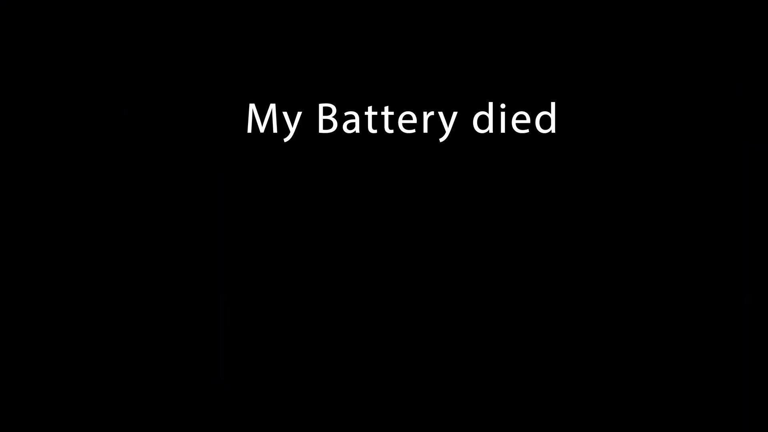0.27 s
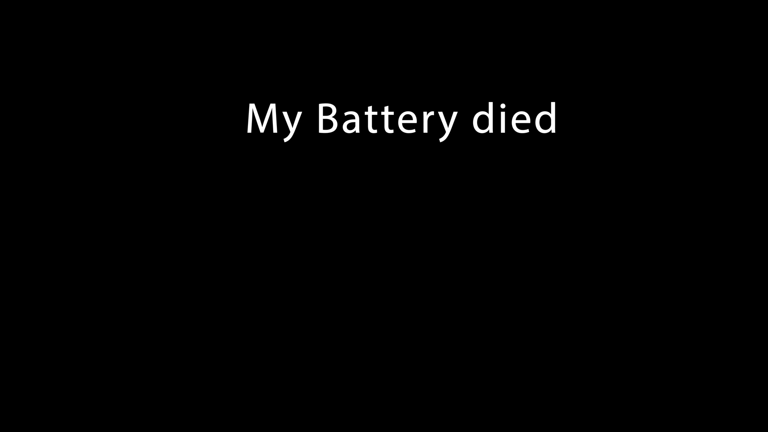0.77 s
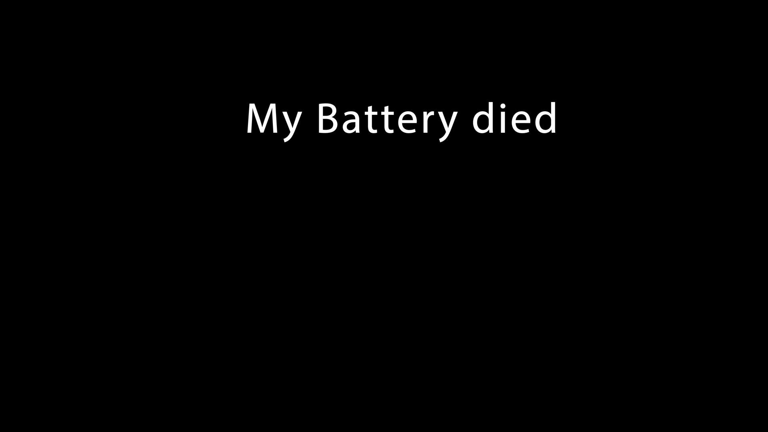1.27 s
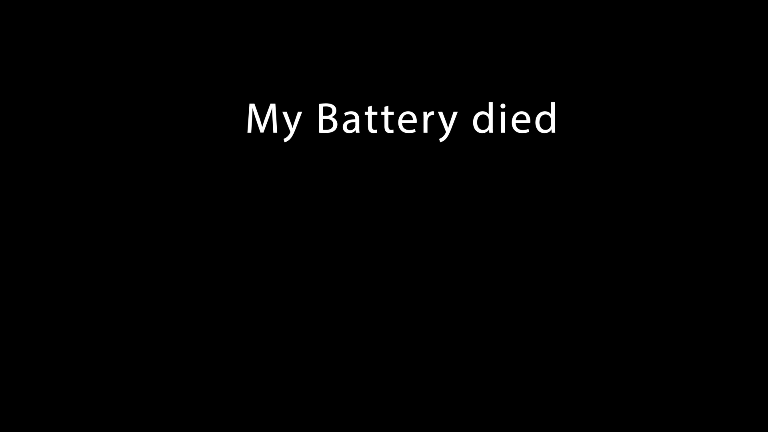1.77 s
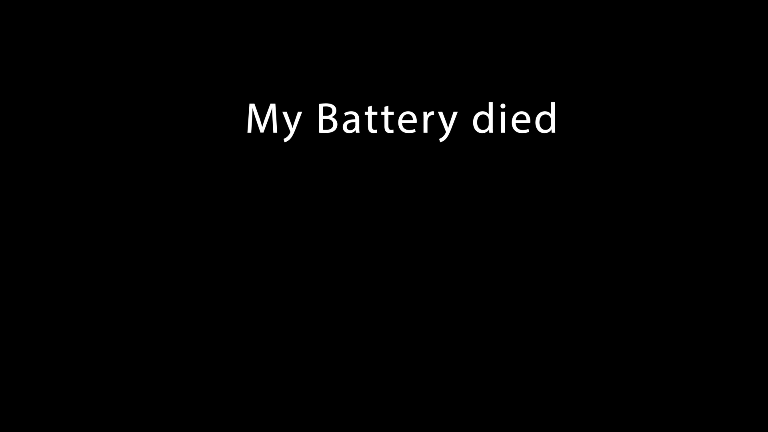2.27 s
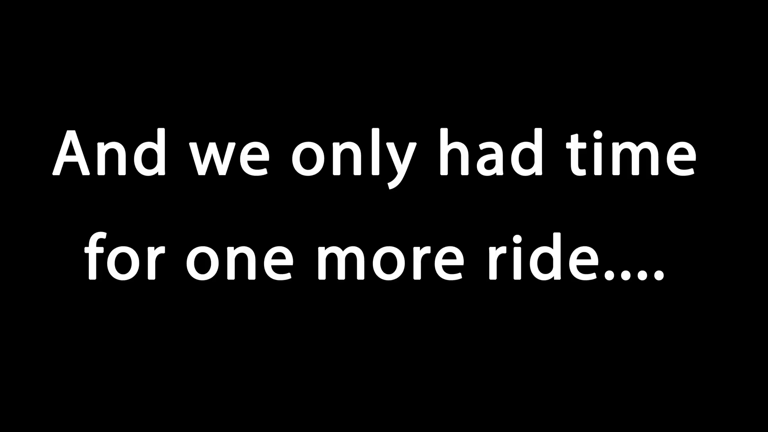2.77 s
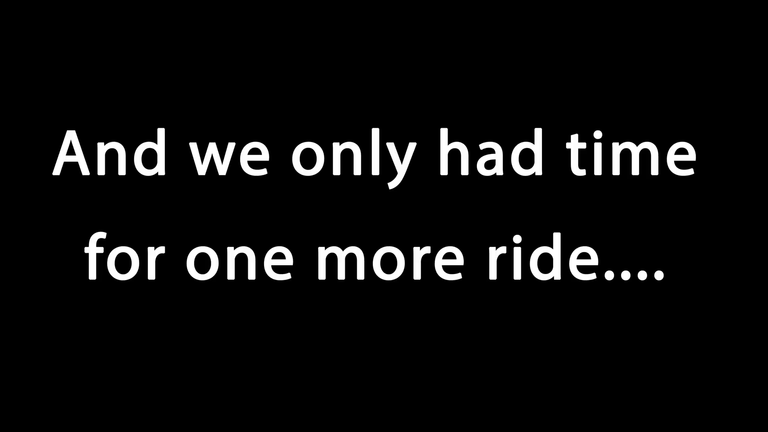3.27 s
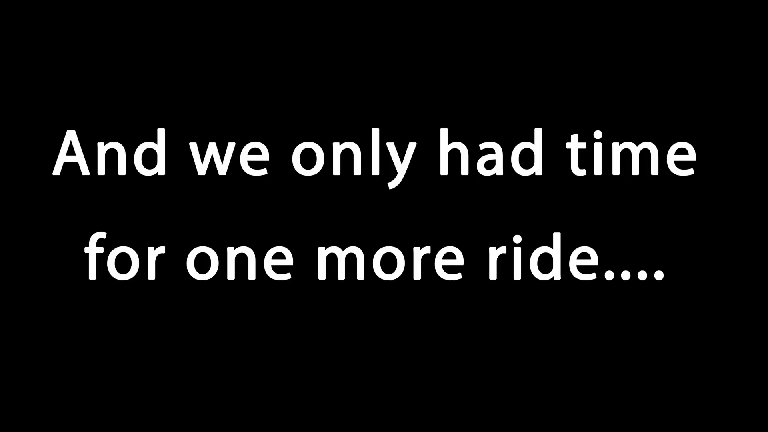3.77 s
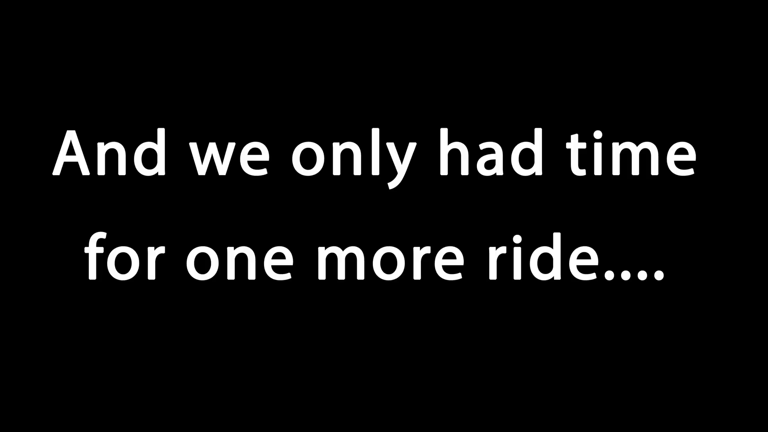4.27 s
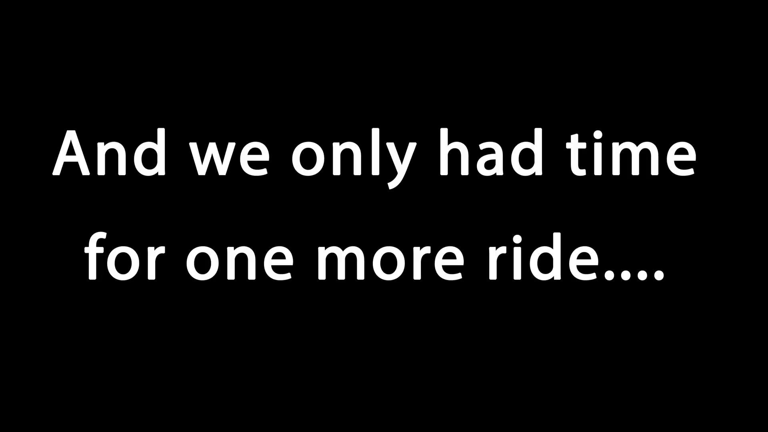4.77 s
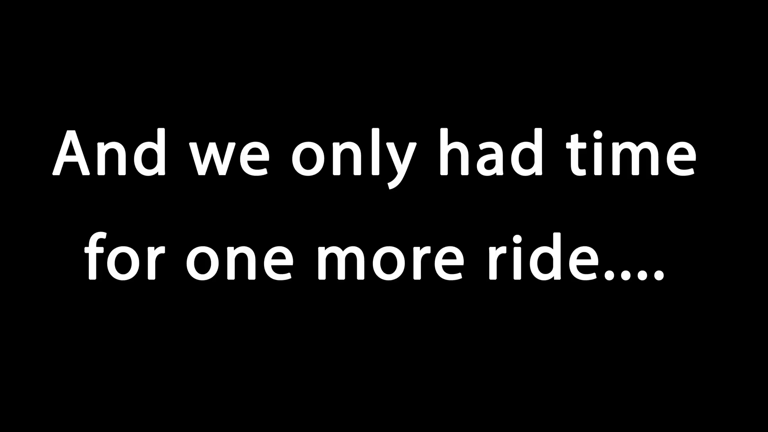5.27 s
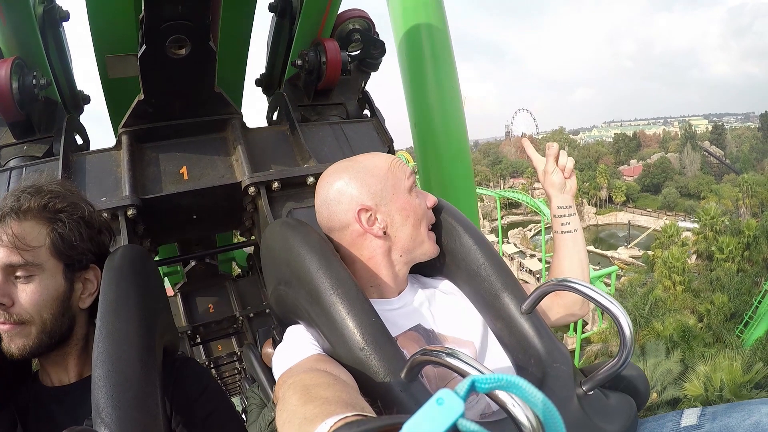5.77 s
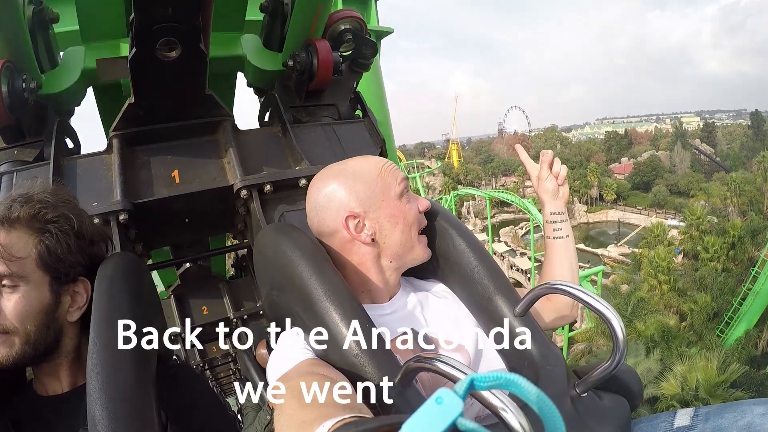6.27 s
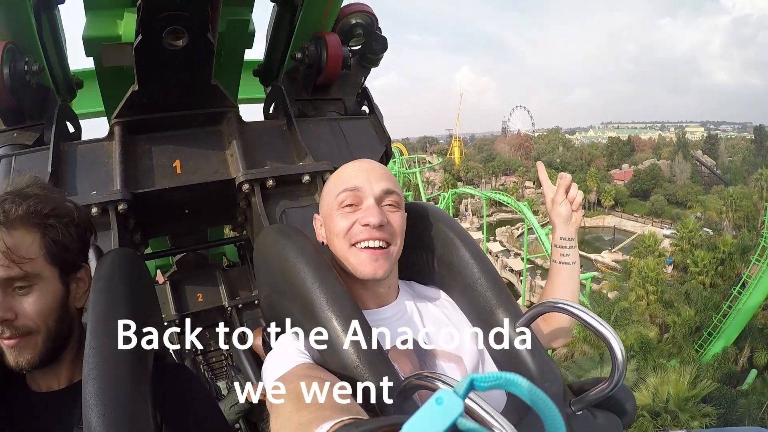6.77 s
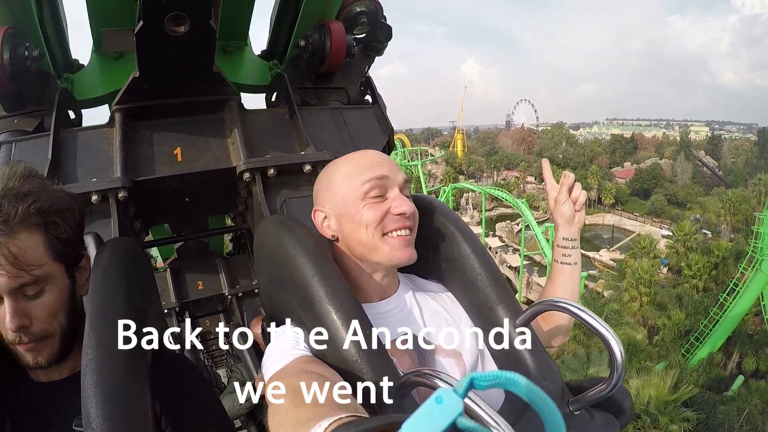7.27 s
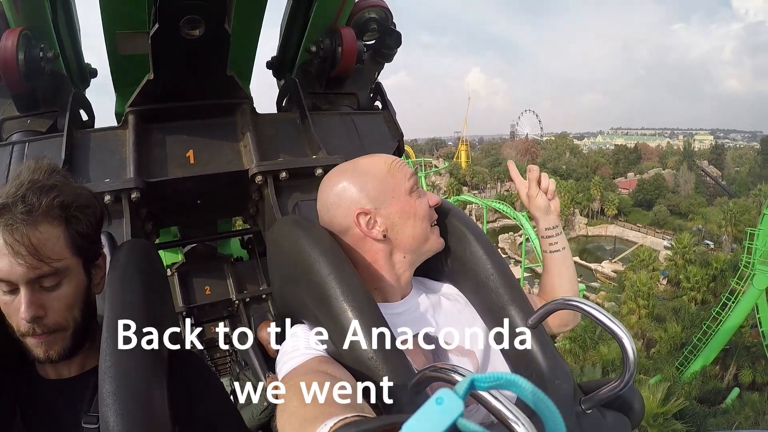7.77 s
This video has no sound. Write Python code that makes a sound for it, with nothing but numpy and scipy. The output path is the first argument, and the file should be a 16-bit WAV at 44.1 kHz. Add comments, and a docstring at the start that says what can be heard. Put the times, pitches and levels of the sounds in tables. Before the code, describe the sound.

First comes only low, soft crackling hiss, steady and slightly wide, with small ticks. Then, without any fade, a close, nearly mono microphone on an open-air coaster train picks up the anti-rollback pawl dropping tooth by tooth, hard and metallic, ringing the car's frame. Chain rattle, rumbling wheels, brief hollow booms and faint high squeaks fill the short gaps.

```python
"""First a faint, crackling hiss: coloured noise with a grainy top and small scattered ticks.
It cuts abruptly to a seat on a roller coaster train climbing its lift hill. At each clack the anti-rollback
pawl drops into the rack and rings the steel car, made from fading sine tones and bursts of noise.
Between the clacks, swells of noise give the softer clatter of the chain and the other cars; rough noise and
narrow resonances make the wheels rumble and squeak. The close microphone rounds off the peaks."""
import sys
import numpy as np
from scipy import signal
from scipy.fft import rfft, irfft, next_fast_len
from scipy.io import wavfile

SR = 44100
rng = np.random.default_rng(int(sys.argv[2]) if len(sys.argv) > 2 else 0)


def to_wav(sig):
    """Store sig (one row per channel, or 1-D mono) as 16-bit WAV at the path in sys.argv[1].

    Samples outside -1..1 are clipped; the rate is SR.
    """
    pcm = np.clip(np.atleast_2d(sig), -1, 1) * 32767
    pcm = np.round(pcm).astype(np.int16)
    wavfile.write(sys.argv[1], SR, pcm.T)  # frames by channels


N = 354563
TIME = np.arange(N) / SR   # seconds
CUT_S = 5.590   # the hiss ends and the train begins
CUTOFF_HZ = 15700

# The pawl rides up a tooth and drops. Each row: drop in seconds, relative blow in dB, relative rattle in dB,
# hardness as a treble tilt in dB, relative scrape before the drop in dB.
CLACKS = [(5.6095, -2.5, -2.5, 1, -18.5), (5.7686, -2.5, -3, 0.5, -24.5), (5.9649, -3.5, -0.5, 0, -19.5),
          (6.2410, 0.5, 4.5, -2, -47), (6.5090, -3.5, -3, -0.5, -21), (6.7600, -20, -12, -9, -59),
          (6.7940, -0.5, 2.5, -0.5, -12.5), (7.134, -22, -16, -1, -47), (7.1616, 0, 1.5, -0.5, -12.5),
          (7.339, -24, -34, 6.5, -64), (7.433, -6, -1, -2, -31), (7.5970, -1.5, 0, -1, -21.5),
          (7.8036, -3.5, -2.5, 1, -21.5), (7.9884, -2, -2, -0.5, -35)]
# Modes of the steel car. Each row: pitch in Hz, relative level in dB, time to fade by 60 dB in seconds.
CAR_MODES = [(167.1, -28, 0.43), (264, -28, 0.27), (382, -18, 0.08), (476.7, -23.5, 0.24),
             (515, -13.5, 0.11), (574.2, -15, 0.17), (614, -16.5, 0.06), (683, -29, 0.068),
             (763.9, -30.4, 0.94), (826, -17.5, 0.17), (900, -25, 0.053), (963, -22.2, 0.44),
             (1032, -26, 0.26), (1096, -7.5, 0.07), (1148, -22, 0.2), (1178, -14.5, 0.26),
             (1211, -12, 0.14), (1343, -8.5, 0.12), (1420, -16, 0.049), (1521, -24, 0.33),
             (1671, -21.5, 0.19), (1794, -33.5, 0.72), (2024, -27, 0.3), (2150, -31, 0.16),
             (2463, -37.5, 0.26)]
# Colour of the car's frame. Each row: frequency in Hz, relative level in dB per Hz.
FRAME_COLOUR = [(40, -18.5), (150, -5.5), (330, -7), (550, -2), (1300, 3), (1700, -13), (3000, -24),
                (6000, -75)]
# Colours of the pawl's rattle and its crack. Each row: frequency in Hz, relative level in dB per Hz.
RATTLE_COLOUR = [(600, -6.5), (1700, 9), (2400, 1.5), (3500, -1.5), (4400, 3), (5350, 0.5), (6100, -8.5),
                 (7500, -12), (9000, -14.5), (11000, -34), (15000, -66)]
CRACK_COLOUR = [(1000, 4.5), (10000, 4), (12000, -7), (14500, -6), (16000, -19)]
# Bright modes of the pawl and rack. Each row: pitch in Hz, width in Hz, level over the broad rattle in dB.
RACK_MODES = [(2480, 15, -6), (2493, 14, 9), (2932, 21, 5.5), (3300, 10, 4.5), (3835, 49, 3.5),
              (4480, 18, 9.5), (4470, 10, 1), (4630, 9, 6.5), (4710, 6.6, 4), (4940, 5.5, 7.5),
              (5310, 125, 3), (5740, 8.8, -0.5), (6500, 12, 6), (6250, 7.6, -9), (7030, 37, -2.5),
              (7700, 2.9, 11), (8140, 31, 2), (9000, 51, -7), (10200, 23, -5)]

# Chain and farther pawls, between the clacks. Each row: peak in seconds, fall in seconds,
# relative level in dB, treble against that level in dB.
CLATTER = [(5.690, 0.2, -25, 4.5), (5.900, 0.056, -27, -10), (6.082, 0.029, -21.5, -4),
           (6.137, 0.066, -18, 4.5), (6.412, 0.04, -16, 3), (6.540, 0.061, -28.5, 7),
           (6.630, 0.069, -28, 8), (6.932, 0.026, -31, -16), (7.01, 0.089, -30, 4),
           (7.361, 0.022, -22.5, -10), (7.455, 0.023, -23, 6), (7.500, 0.039, -14.5, -2),
           (7.714, 0.042, -23.5, -13), (7.850, 0.12, -25, -19), (7.948, 0.03, -18.5, -2.5)]
# Colour of the clatter. Each row: frequency in Hz, relative level in dB per Hz.
CLATTER_COLOUR = [(60, -15), (200, -6), (450, -2), (800, -2), (1150, 5.5), (1380, -3.5), (1550, -7.5),
                  (2400, -18), (3400, -20.5), (5300, -22.5), (6400, -31), (9000, -38.5), (11000, -51),
                  (15000, -56)]
SCRAPE_LEAD_S, SCRAPE_FALL_S, SCRAPE_TREBLE_DB = 0.021, 0.018, -1   # it peaks this long before each drop
RISE_SHARE = 0.4   # a swell's rise time as a share of its fall time

# Rolling of the wheels over time. Each row: time in seconds, relative level in dB.
ROLLING_LEVEL = [(5.59, -28), (5.95, -24.5), (6.23, -34), (6.35, -34), (6.55, -26), (6.72, -35.5),
                 (6.9, -30), (7.1, -37.5), (7.5, -29.5), (7.85, -31), (8.04, -28.5)]
# Colours of the rolling and of the swaying car. Each row: frequency in Hz, relative level in dB per Hz.
ROLLING_COLOUR = [(20, -20), (70, -5.5), (150, -2), (330, -3), (600, -6), (800, 3), (1200, -1),
                  (1550, -8.5), (3300, -22), (5000, -31.5), (6500, -36.5), (9000, -42), (15000, -56)]
SWAY_COLOUR = [(15, -8), (30, -5), (43, -0.5), (65, -5.5), (120, -25), (400, -63), (2000, -100)]
# Low modes kept going by the wheels. Each row: pitch in Hz, width in Hz, relative level in dB.
DRONE_MODES = [(165, 25, -0.5), (270, 25, -5), (137, 7.5, -2.5)]
DRONE_DB, DRONE_GROWS_DB_PER_S = -45.5, 6   # relative level before following the rolling
DRONE_FOLLOWS = 0.5   # share of the rolling's swing in dB
SWAY_DB, SWAY_GROWS_DB_PER_S = -41.5, 1.7   # relative level at the cut
# The car booms over a track joint. Each row: middle in seconds, length in seconds, pitch in Hz, relative dB.
BOOMS = [(6.140, .06, 467, -24), (6.175, .06, 261, -23.5), (6.225, 0.14, 170, -26.5),
         (6.268, 0.049, 256, -22), (6.320, 0.069, 268, -31), (7.240, .06, 171, -34), (7.880, .12, 145, -35)]
# Wheel and chain squeaks. Each row: middle in seconds, length in seconds, pitch in Hz, relative level in dB.
SQUEAKS = [(5.84, 0.085, 4900, -43.5), (5.917, 0.05, 3570, -37), (5.925, .05, 5580, -41.5),
           (6.037, 0.036, 4770, -41), (6.102, 0.069, 4770, -40), (6.115, 0.028, 4000, -39),
           (6.529, 0.076, 5160, -35), (6.96, .18, 2480, -47), (7.02, 0.067, 4750, -42),
           (7.37, .06, 2650, -42), (7.389, 0.045, 5190, -44), (7.461, 0.052, 4880, -32),
           (7.582, 0.041, 4840, -39), (7.690, 0.12, 2480, -46.5)]

SINGING_HZ, SINGING_DB = 764.2, -36   # a steel mode that the chain keeps sounding
LINKS_PER_S, LINK_LOW_HZ, LINK_HIGH_HZ, LINK_T60_S = 45, 4190, 5870, 0.1   # small steel parts of the chain
# The track heard from all around. Each row: frequency in Hz, relative level in dB per Hz.
AROUND_COLOUR = [(40, -35), (110, -34), (200, -16), (290, -2.5), (420, 5.5), (650, -3), (800, -3),
                 (1200, -20), (1600, -7), (2200, -38), (3200, -28.5), (4000, -49), (9000, -55),
                 (15000, -53)]
AROUND_DB = -52

# The hiss over time. Each row: time in seconds, body level in dB, level of the grainy top in dB.
HISS_LEVEL = [(0, -53, -61), (0.2, -53.5, -62.5), (0.45, -52, -58), (0.85, -53, -61.5), (1.65, -53.5, -60),
              (2.2, -53.5, -58.5), (2.8, -52.5, -59.5), (3.2, -52.5, -60), (4.2, -51.5, -58),
              (5.59, -51.5, -59)]
# Colours of the body and of the grainy top. Each row: frequency in Hz, relative level in dB per Hz.
HISS_BODY = [(20, 1.5), (33, 3.5), (60, -1.5), (240, -6), (650, -4.5), (1020, -5.5), (1400, -1), (1850, 2),
             (2200, -4), (2900, -1.5), (3300, 0.5), (3950, -7.5), (5400, -14), (7000, -22)]
HISS_FIZZ = [(2500, -9), (4950, 1.5), (5500, -3.5), (6200, 5), (7050, -6), (7400, -1), (7800, -5),
             (8400, 0), (9700, -0.5), (10450, -4.5), (11600, -6.5), (12300, -2), (13300, -7.5),
             (15500, -13.5)]
# The fizz thickens briefly. Each row: middle in seconds, level in dB.
FLURRIES = [(0.51, -59), (0.96, -59), (1.77, -54.5), (2.18, -58), (2.55, -59), (4.05, -52.5)]
FLURRY_S = 0.031   # half width of a flurry
# Ticks in the hiss. Each row: start in seconds, relative level in dB.
TICKS = [(0.483, -31), (.5677, -34), (1.2637, -30), (1.3653, -30.5), (1.506, -35), (3.005, -32),
         (4.227, -35), (5.1283, -36), (5.3965, -29)]
# Hollows in the hiss. Each row: centre in Hz, width in Hz, depth from 0 to 1.
HISS_DIPS = [(248, 22, 0.38), (1025, 36, 0.73), (5370, 220, 0.8), (6700, 220, 0.44), (7670, 380, 0.73)]
# Left against right. Each row: frequency in Hz, left minus right in dB.
HISS_BALANCE = [(60, -1.5), (200, -7), (700, -12.5), (1290, -9.5), (2380, -8.5), (4400, -5.5), (8120, -2),
                (15000, 3.5)]
# How alike the two sides are. Each row: frequency in Hz, correlation from 0 to 1.
HISS_LIKENESS = [(60, 0.8), (640, 1), (1400, 0.86), (3100, 0.85), (7000, 0.54), (15000, 0.78)]
# Delay of the right side. Each row: frequency in Hz, lag in radians.
HISS_PHASE = [(500, 0.046), (2300, 0.57), (5500, 0.42), (8000, 0.23), (15000, .05)]


def from_db(db):
    """Decibels to gain."""
    return 10 ** (np.asarray(db) / 20)


def rms_one(x):
    """Scale to an average strength (rms) of 1."""
    return x / np.sqrt(np.mean(x ** 2) + 1e-20)


def in_time(rows):
    """Draw one smooth-running curve over time for each column of a table."""
    s, *columns = np.transpose(rows)
    return [np.interp(TIME, s, column) for column in columns]


def at_bins(points, size):
    """Read a table, over log frequency, at the bins of a transform."""
    hz, value = np.transpose(points)
    bins_hz = np.fft.rfftfreq(size, 1 / SR)
    return np.interp(np.log(bins_hz + 1), np.log(hz), value)


def shaped(x, spectrum):
    """Colour a signal by a spectrum in dB."""
    length = x.shape[-1]
    size = next_fast_len(length, True)
    return irfft(rfft(x, size) * from_db(at_bins(spectrum, size)), size)[..., :length]


def noise(spectrum, grain_db=0):
    """Coloured noise of rms 1; uneven sizes of its tiny impacts make it grainy."""
    sizes = from_db(grain_db * np.minimum(rng.exponential(1, N), 7))
    return rms_one(shaped(rng.standard_normal(N) * sizes, spectrum))


def drift(rate):
    """Wander at random: straight lines between random values, so many values a second."""
    knots = rng.standard_normal(4000)
    return np.interp(TIME * rate, np.arange(len(knots)), knots)


def resonance(x, hz, width_hz):
    """Two-pole resonance with gain 1 at its peak."""
    r = np.exp(-np.pi * width_hz / SR)
    feed = np.array([1, 0, -1]) * (1 - r * r) / 2
    back = [1, -2 * r * np.cos(2 * np.pi * hz / SR), r * r]
    return signal.lfilter(feed, back, x)


def ringing(x, modes):
    """A rough force heard through steel: its modes (Hz, width Hz, dB) stand out and ring on."""
    return x + sum(from_db(db) * resonance(x, hz, width_hz) for hz, width_hz, db in modes)


def dying(t, t60):
    """Envelope that loses 60 dB in t60 seconds."""
    return np.exp(-np.log(1000) * t / t60)


def strikes(times, gains, response):
    """Place one copy of a response at each time."""
    out = np.zeros(N)
    for s, gain in zip(times, gains):
        start = int(s * SR)
        out[start:start + len(response)] += gain * response[:N - start]
    return out


def brief_tones(rows, width_hz, taper):
    """A narrow resonance, rubbed at random, swells and fades once for each row."""
    out = np.zeros(N)
    for s, length_s, hz, db in rows:
        window = signal.windows.tukey(int(1.5 * length_s * SR), taper)
        rubbed = resonance(rng.standard_normal(SR), hz, width_hz)
        tone = resonance(rubbed, hz, width_hz)[-len(window):]
        start_s = s - len(window) / SR / 2
        out += strikes([start_s], [from_db(db)], window * rms_one(tone))
    return out


def car_blows(knock_hz, knock_s, knock_db, modes_db, frame_db, frame_t60, build_s, vary_db, fresh_db):
    """Each blow: a short knock, the car's clear modes, and the dense modes of the frame around it."""
    t, out = TIME[:SR], np.zeros(N)
    knock = t / knock_s * np.exp(1 - t / knock_s) * np.sin(2 * np.pi * knock_hz * t)
    modes = np.array([from_db(db) * dying(t, t60) * np.sin(2 * np.pi * (hz * t + rng.random()))
                      for hz, db, t60 in CAR_MODES])
    frame = noise(FRAME_COLOUR)
    arrival = 1 - np.exp(-(t / build_s) ** 2)   # the blow takes a moment to spread through the steel
    for s, blow_db, _, tilt_db, _ in CLACKS:
        # the same car answers every time, but each tooth is met a little differently
        mode_gains = from_db(modes_db + vary_db * rng.standard_normal(len(CAR_MODES)))
        clear = mode_gains @ modes
        fresh = from_db(fresh_db) * np.roll(frame, int(s * SR))[:SR]
        dense = rms_one(frame[:SR] + fresh) * dying(t, frame_t60)
        blow = arrival * (from_db(knock_db) * knock + clear + from_db(frame_db) * dense)
        hardness = [(400, -tilt_db), (1600, tilt_db)]   # a harder blow favours the higher modes
        out += strikes([s], [from_db(blow_db)], shaped(blow, hardness)[:-SR // 10])
    return out


def pawl_rattle(rattle_db, rise_s, rattle_t60, tail_db, tail_t60, crack_db, crack_t60):
    """The pawl meets the tooth with a crack and chatters on it: two fading bursts of noise."""
    s, _, bright_db, _, _ = np.transpose(CLACKS)
    t = TIME[:SR]
    fall = dying(t, rattle_t60) + from_db(tail_db) * dying(t, tail_t60)
    fade = (1 - np.exp(-t / rise_s)) * fall
    rattle = strikes(s, from_db(bright_db + rattle_db), fade) * noise(RATTLE_COLOUR, grain_db=2)
    crack = strikes(s, from_db(bright_db + crack_db), dying(t, crack_t60)) * noise(CRACK_COLOUR)
    return rattle + crack


def clatter(split_hz, wander_db):
    """The pawl's scrape and the farther blows arrive smeared by the structure: they swell and die away."""
    scrapes = [(s - SCRAPE_LEAD_S, SCRAPE_FALL_S, db, SCRAPE_TREBLE_DB) for s, *_, db in CLACKS]
    body_power, treble_power = np.zeros(N), np.zeros(N)
    for s, fall_s, db, treble_db in CLATTER + scrapes:
        rise = (np.minimum(TIME - s, 0) / (RISE_SHARE * fall_s)) ** 2
        fall = 2 * np.maximum(TIME - s, 0) / fall_s
        swell = np.exp(-np.minimum(rise + fall, 20))
        body_power += swell * from_db(db) ** 2
        treble_power += swell * from_db(db + treble_db) ** 2
    grains = noise(CLATTER_COLOUR, grain_db=2.2)
    grains = grains * from_db(wander_db * drift(130))
    low = signal.sosfiltfilt(signal.butter(2, split_hz, fs=SR, output="sos"), grains)
    return np.sqrt(body_power) * low + np.sqrt(treble_power) * (grains - low)


def through_car(x, boost_db):
    """A rough sound also excites the car's modes."""
    return ringing(x, [(hz, np.log(1000) / np.pi / t60, boost_db) for hz, _, t60 in CAR_MODES])


def wheels(flutter_db, drone_cut_hz):
    """Rolling rumbles and keeps the car's low modes droning; drone and sway grow as the train climbs."""
    rolling_db, = in_time(ROLLING_LEVEL)
    climbed_s = np.maximum(TIME - CUT_S, 0)
    swing_db = rolling_db - rolling_db[TIME > CUT_S].mean()
    drone_db = DRONE_DB + DRONE_GROWS_DB_PER_S * climbed_s + DRONE_FOLLOWS * swing_db
    road = signal.sosfilt(signal.butter(2, drone_cut_hz, fs=SR, output="sos"), rng.standard_normal(N))
    drone = rms_one(sum(from_db(db) * resonance(road, hz, width) for hz, width, db in DRONE_MODES))
    rolling = noise(ROLLING_COLOUR, grain_db=3.5) * from_db(flutter_db * drift(60))
    sway = from_db(SWAY_DB + SWAY_GROWS_DB_PER_S * climbed_s) * noise(SWAY_COLOUR)
    return from_db(rolling_db) * rolling + from_db(drone_db) * drone + sway


def joint_booms():
    """The car booms over a track joint: low resonances swell briefly."""
    return brief_tones(BOOMS, width_hz=27, taper=0.86)


def wheel_squeaks():
    """Wheels and chain squeak: high resonances, rubbed at random, swell briefly."""
    return from_db(-3.5) * brief_tones(SQUEAKS, width_hz=135, taper=0.64)


def singing_steel(waver_turns, flutter_db):
    """One steel mode sings throughout, wavering in pitch and strength."""
    tone = np.sin(2 * np.pi * (SINGING_HZ * TIME + waver_turns * drift(14)))
    return from_db(SINGING_DB) * rms_one(tone * from_db(flutter_db * drift(25)))


def chain_links(level_db, spread_db, count=16):
    """Chain links touch at random and ring briefly, louder as the rolling grows."""
    rolling_db, = in_time(ROLLING_LEVEL)
    touch_db = rolling_db + level_db + spread_db * np.clip(rng.standard_normal(N), -2, 2)
    touches = (rng.random(N) < LINKS_PER_S / SR) * from_db(touch_db)
    which = rng.integers(0, count, N)   # each touch sounds one of the pitches
    pitches = np.geomspace(LINK_LOW_HZ, LINK_HIGH_HZ, count) * rng.uniform(0.98, 1.02, count)
    t, out = TIME[:SR // 4], np.zeros(N)
    for k, hz in enumerate(pitches):
        at = np.flatnonzero(touches * (which == k))
        ring = (dying(t, LINK_T60_S) - dying(t, LINK_T60_S / 2)) * np.sin(2 * np.pi * hz * t)
        out += strikes(at / SR, touches[at] * LINK_LOW_HZ / hz, ring)
    return out


def track_around():
    """A faint wash of the track from all around, added to one side and taken from the other."""
    return from_db(AROUND_DB) * noise(AROUND_COLOUR) * [[1], [-1]]


def hiss(tick_db, tick_t60, flicker_db, wander_db):
    """A soft hiss of coloured noise with a grainy top, flurries and scattered ticks."""
    body_db, top_db = in_time(HISS_LEVEL)
    flurry_power = sum(from_db(db) ** 2 * np.exp(-np.minimum(((TIME - s) / FLURRY_S) ** 2, 20))
                       for s, db in FLURRIES)
    fizz_level = np.sqrt(from_db(top_db + wander_db * drift(14)) ** 2 + flurry_power)
    s, db = np.transpose(TICKS)
    ticks = strikes(s, from_db(db + tick_db), dying(TIME[:SR], tick_t60))
    flicker = from_db(flicker_db * drift(110))

    def layer():
        body = from_db(body_db) * noise(HISS_BODY, grain_db=3.0)
        fizz = fizz_level * noise(HISS_FIZZ, grain_db=4.0)
        tick_noise = noise(HISS_FIZZ) + from_db(-5.5) * noise(HISS_BODY)
        return flicker * (body + fizz) + ticks * tick_noise

    return spread_sides(layer(), layer())


def spread_sides(mid, side):
    """Mix a shared and a differing layer into left and right, then set balance and lag by pitch."""
    size, signs = next_fast_len(N, True), np.array([[1], [-1]])
    alike = np.clip(at_bins(HISS_LIKENESS, size), 0, 1)
    shared = np.sqrt((1 + alike) / 2) * rfft(mid, size)
    differing = np.sqrt((1 - alike) / 2) * rfft(side, size)
    pair = shared + signs * differing
    pan = from_db(signs * at_bins(HISS_BALANCE, size) / 2)
    pair[1] *= np.exp(-1j * at_bins(HISS_PHASE, size))
    return irfft(pair * pan / pan.mean(axis=0), size)[:, :N]


def hollowed(x):
    """Narrow dips colour the hiss."""
    return x - sum(np.clip(depth, 0, 1) * resonance(x, hz, width_hz) for hz, width_hz, depth in HISS_DIPS)


def scene():
    """The hiss gives way at once to the climbing train, heard almost in mono."""
    blows = car_blows(knock_hz=896, knock_s=0.0014, knock_db=-10.5, modes_db=-0.06, frame_db=-8,
                      frame_t60=0.13, build_s=0.0013, vary_db=0.5, fresh_db=-4)
    rattle = pawl_rattle(rattle_db=-18.0, rise_s=0.0023, rattle_t60=0.081, tail_db=-12.5, tail_t60=0.28,
                         crack_db=-39, crack_t60=0.082)
    chain = from_db(-2) * through_car(clatter(split_hz=4600, wander_db=1.3), boost_db=-6.5)
    rolling = wheels(flutter_db=1.0, drone_cut_hz=480) + joint_booms()
    steel = singing_steel(waver_turns=0.12, flutter_db=3.5) + chain_links(level_db=-5.5, spread_db=1.5)
    train = blows + steel + ringing(rattle + chain + rolling + wheel_squeaks(), RACK_MODES)
    before = hollowed(hiss(tick_db=-9.5, tick_t60=0.011, flicker_db=0.52, wander_db=0.6))
    return np.where(TIME < CUT_S, before, train + track_around())


def record(dry):
    """The microphone rounds off the loudest peaks and the top is cut."""
    top = 1.0   # the rounded wave stays below this
    rounded = dry / (1 + (dry / top) ** 4) ** (1 / 4)
    return signal.sosfilt(signal.ellip(10, 0.1, 80, CUTOFF_HZ, fs=SR, output="sos"), rounded)


dry = scene()
out = record(dry)
to_wav(out)
```